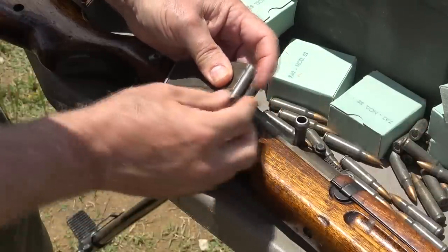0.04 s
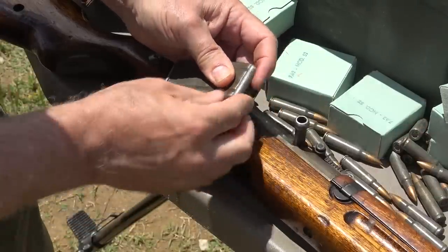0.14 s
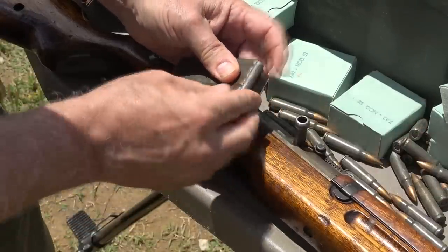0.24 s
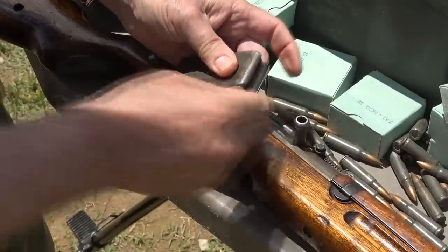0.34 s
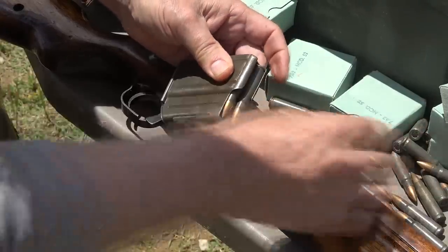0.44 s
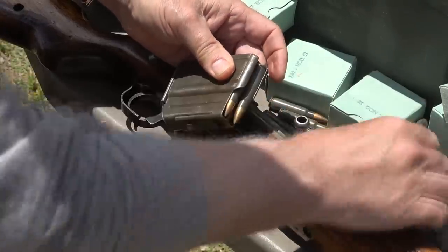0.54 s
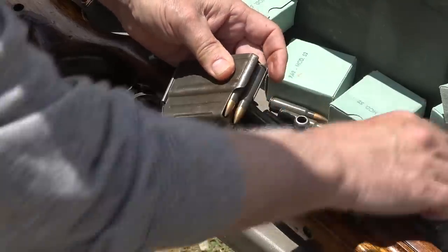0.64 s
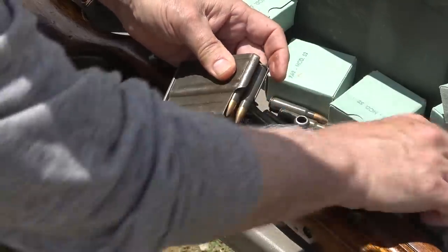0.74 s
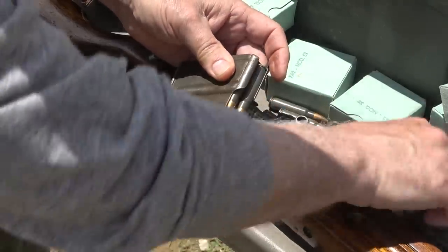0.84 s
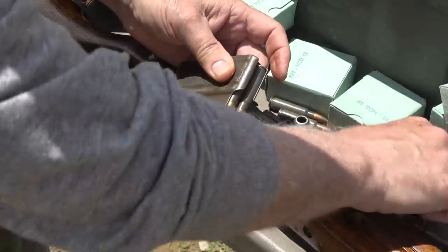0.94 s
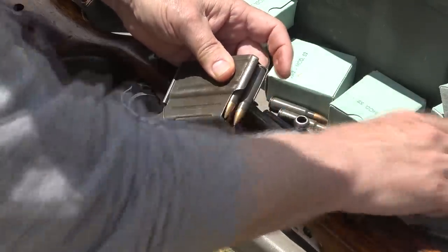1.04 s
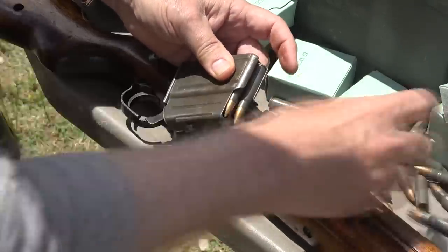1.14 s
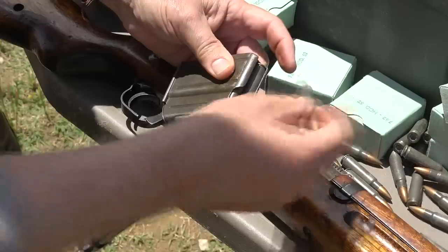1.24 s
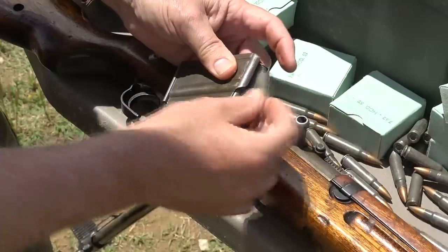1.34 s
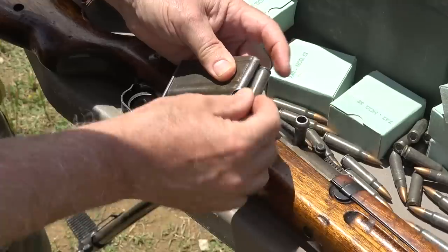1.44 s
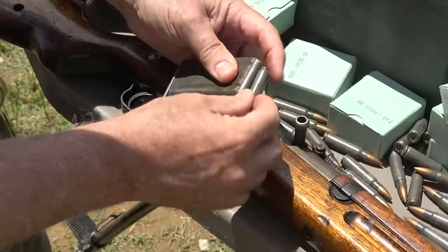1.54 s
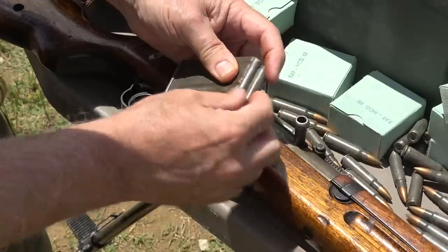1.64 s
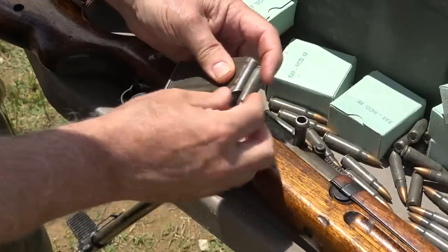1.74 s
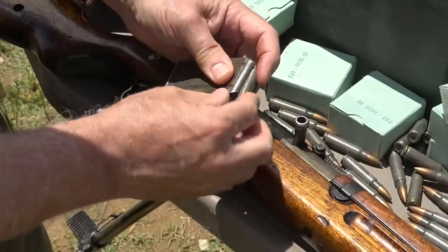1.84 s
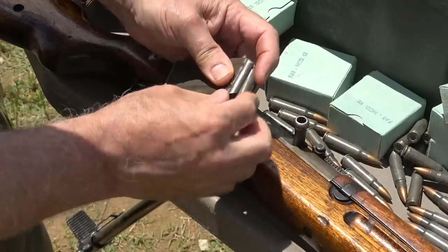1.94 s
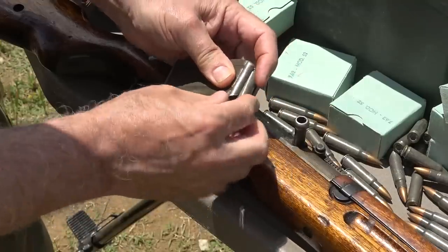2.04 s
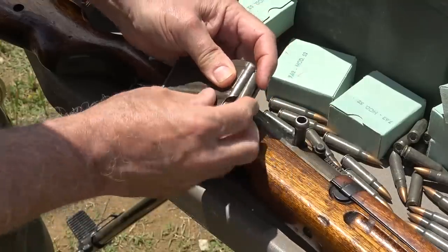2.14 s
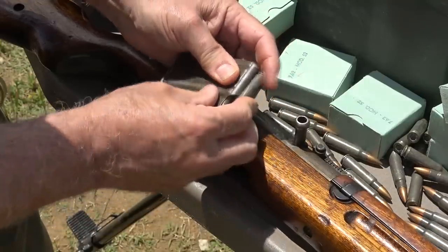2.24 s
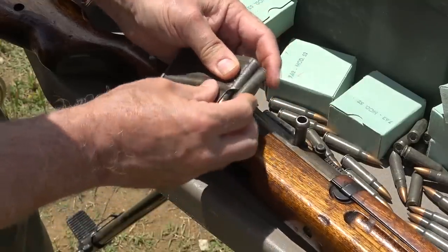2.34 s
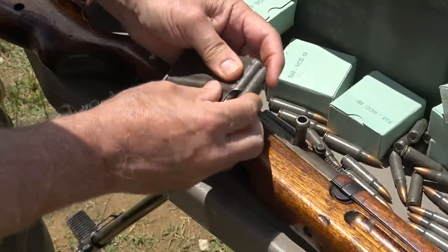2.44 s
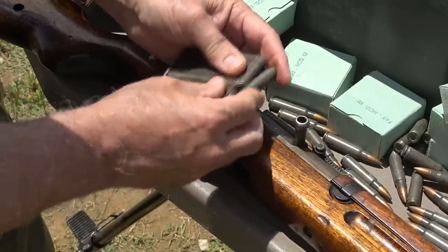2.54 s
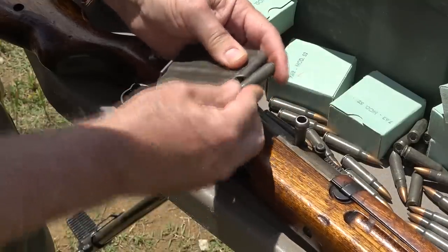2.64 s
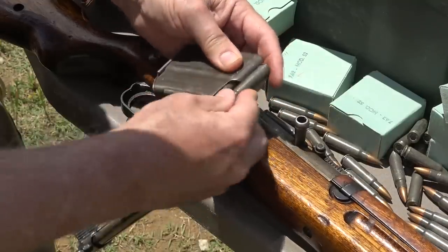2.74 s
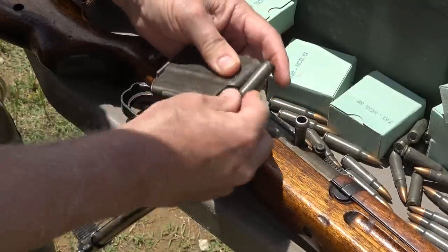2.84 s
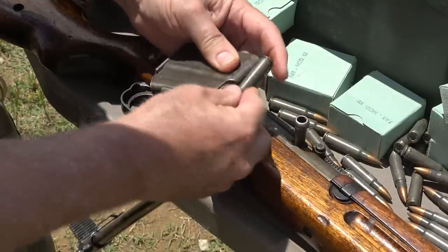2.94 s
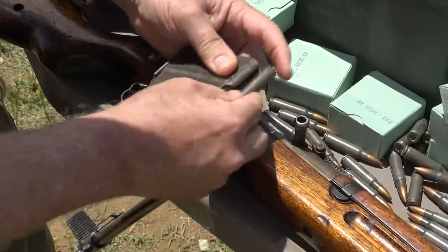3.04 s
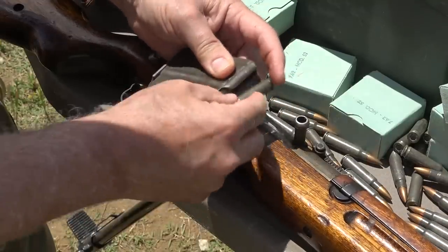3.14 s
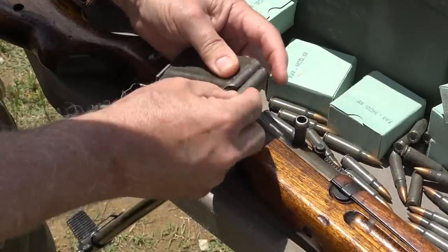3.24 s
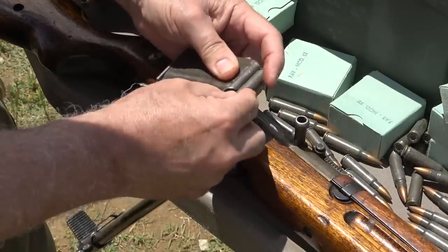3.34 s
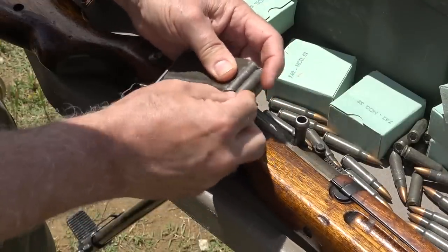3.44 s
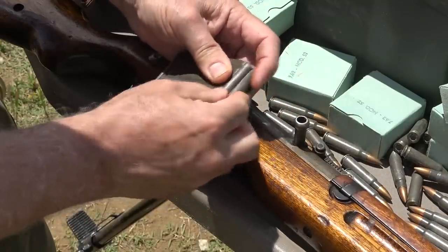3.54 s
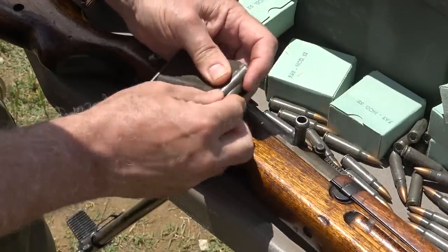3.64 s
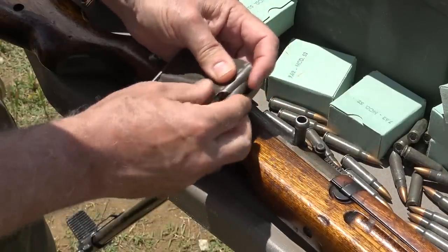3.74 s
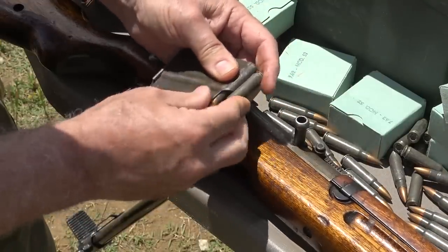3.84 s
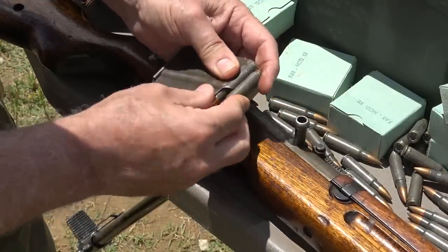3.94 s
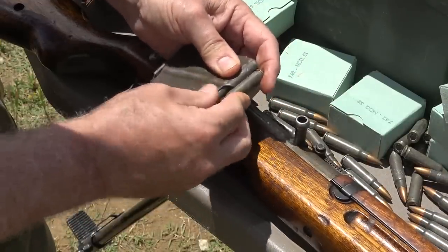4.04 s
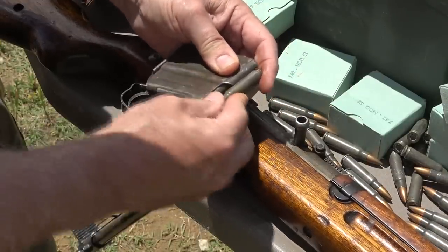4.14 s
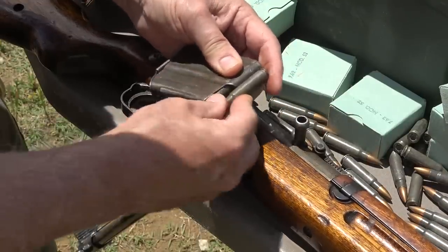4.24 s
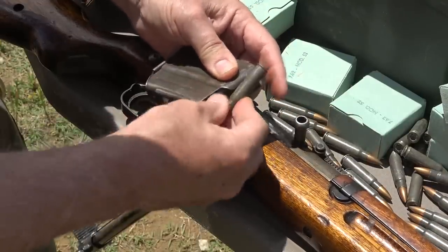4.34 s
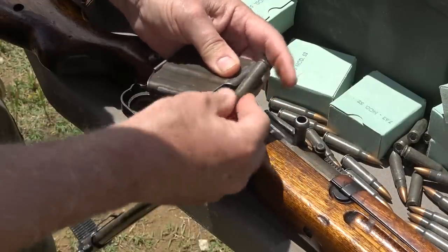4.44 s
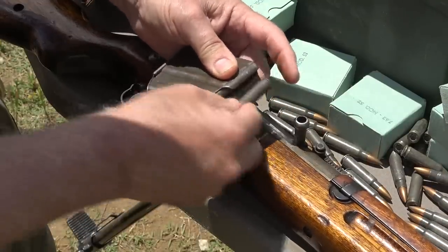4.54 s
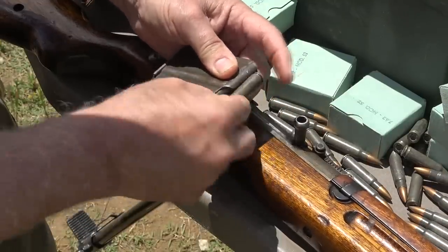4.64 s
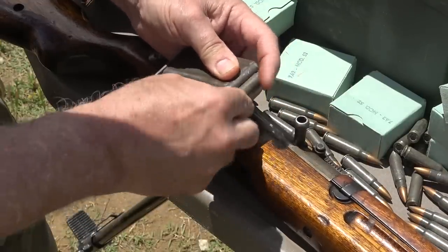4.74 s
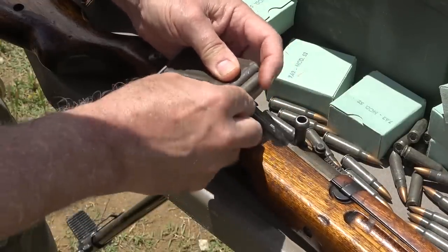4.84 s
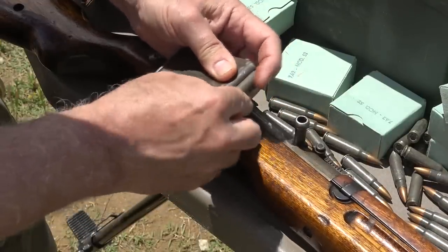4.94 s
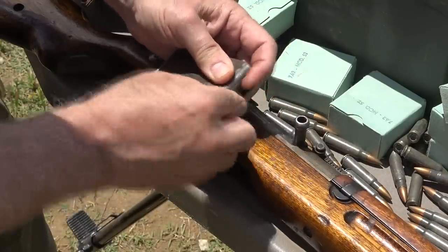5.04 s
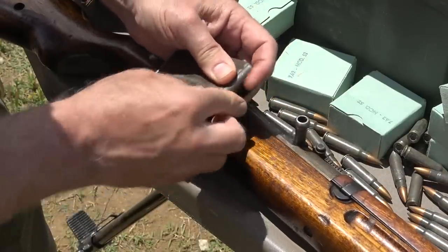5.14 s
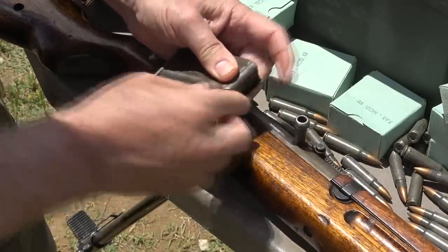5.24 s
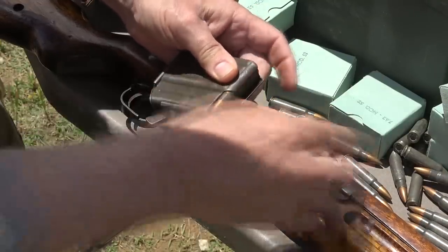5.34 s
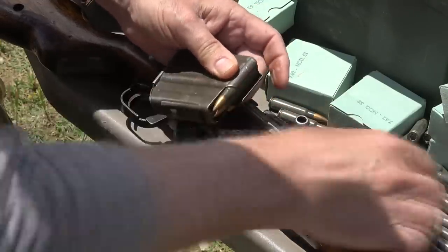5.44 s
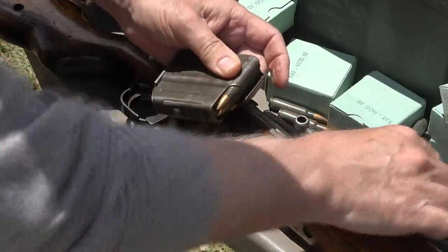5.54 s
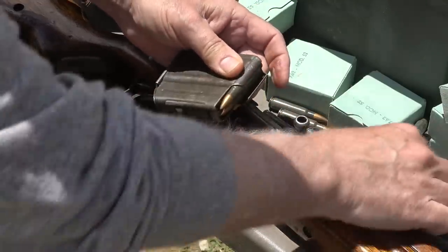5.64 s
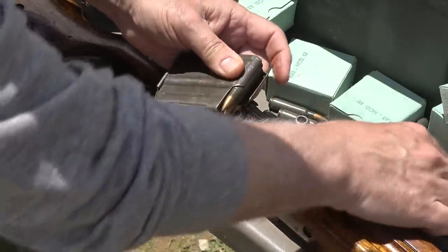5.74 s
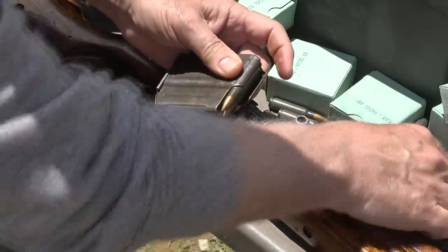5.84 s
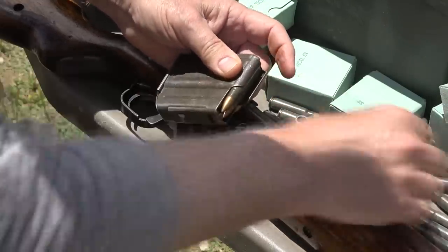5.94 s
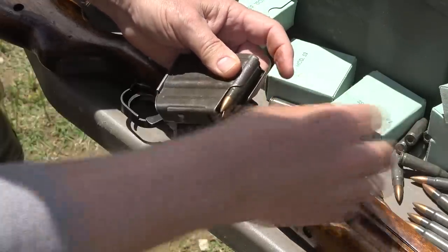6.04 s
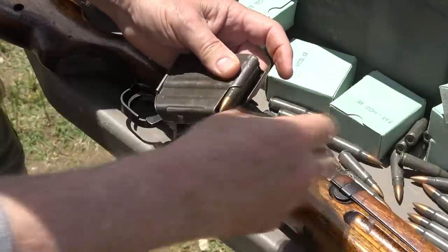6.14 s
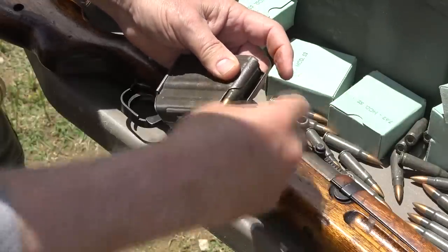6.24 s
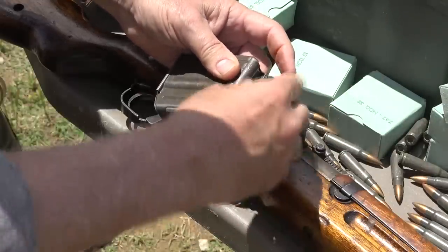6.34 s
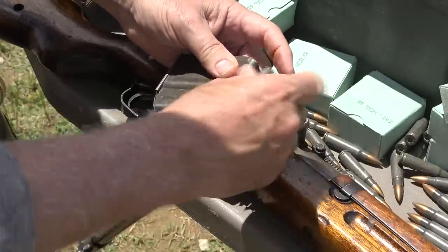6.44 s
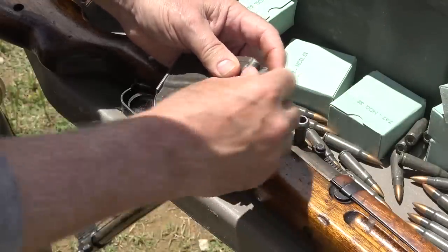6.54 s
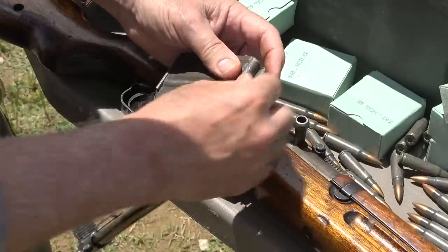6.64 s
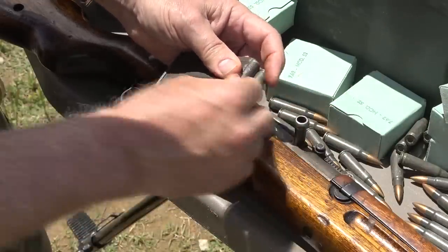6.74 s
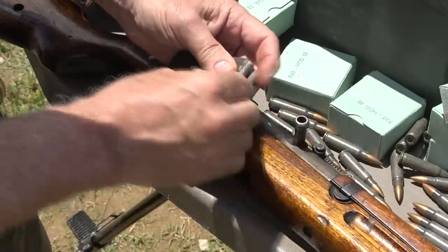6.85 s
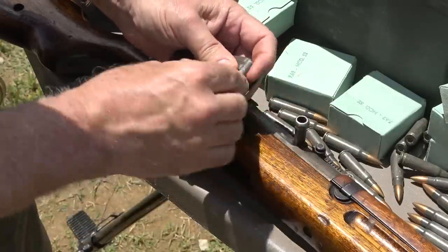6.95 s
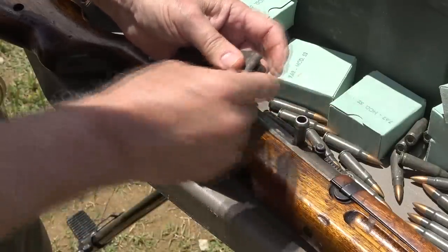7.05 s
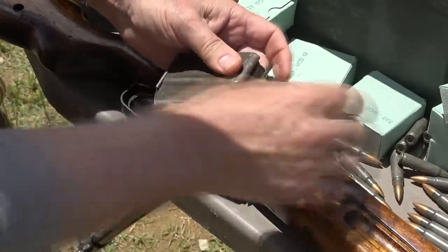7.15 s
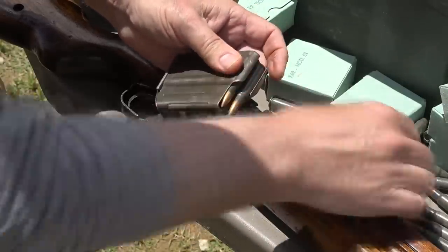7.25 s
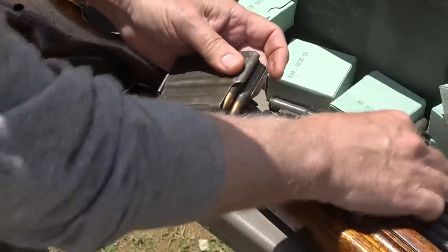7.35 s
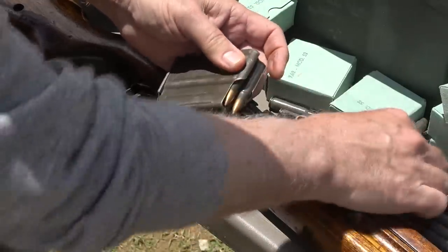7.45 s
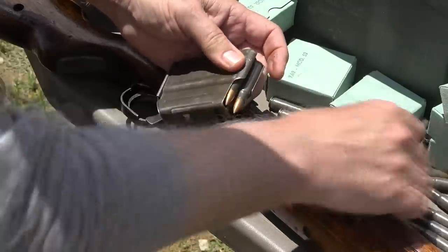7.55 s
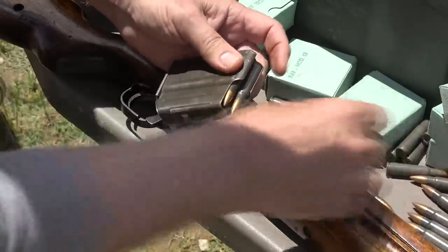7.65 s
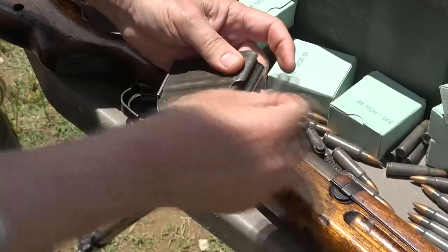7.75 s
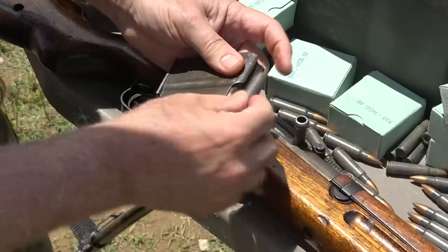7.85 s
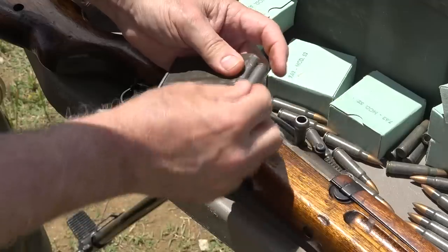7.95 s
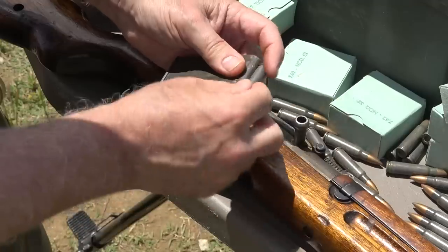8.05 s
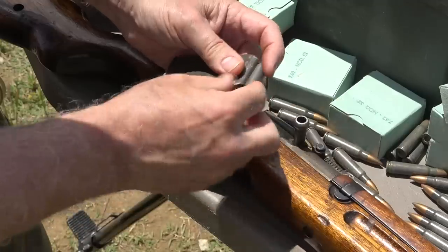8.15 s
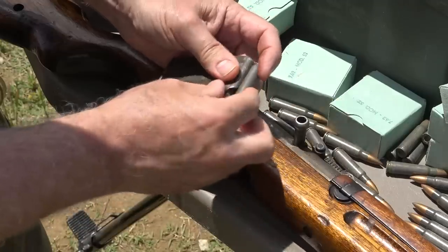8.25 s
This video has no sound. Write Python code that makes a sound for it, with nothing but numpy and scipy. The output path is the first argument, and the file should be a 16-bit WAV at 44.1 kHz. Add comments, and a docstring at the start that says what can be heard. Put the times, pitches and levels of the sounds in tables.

```python
"""Loading a rifle magazine outdoors

At a bench, cartridges are pressed into a hand-held steel box magazine: pitched cracks, choked steel rings and
stick-slip scrapes as each new round touches the lips, bounces, feels for its place and snaps home on the spring.
Three times the hand rummages: loose cartridges drum on the modes of a hollow plastic case and clink in beating notes.
Behind it: filtered-noise open air and wind puffs, gliding bird whistles and faint buzzy calls."""
import sys
import numpy as np
from scipy import signal
from scipy.fft import rfft, irfft, next_fast_len
from scipy.io import wavfile
from scipy.ndimage import uniform_filter1d, map_coordinates

SR = 44100
rng = np.random.default_rng(int(sys.argv[2]) if len(sys.argv) > 2 else 0)


def digitize_waveform(pressure):
    """Quantize a signal to 16-bit integers and store it at the path in sys.argv[1].

    Rows of a 2-D input are taken as channels; values are limited to [-1, 1].
    """
    field = np.atleast_2d(pressure).T
    bounded = np.clip(field, -1, 1)
    quanta = np.round(bounded * 32767).astype(np.int16)
    wavfile.write(sys.argv[1], SR, quanta)


N = 365148
CLOCK = np.arange(N) / SR  # seconds into the scene
AGE = np.arange(SR // 4) / SR  # seconds since a blow
TOP_HZ = 16200  # upper band limit of the whole sound


def amp(db):
    """Decibels to gain."""
    return 10 ** (np.asarray(db) / 20)


def unit(x):
    """Scale a sound to rms 1."""
    return x / np.sqrt(np.mean(x ** 2) + 1e-20)


def crest(x):
    """Scale a blow so that its loudest millisecond has the power of a full-scale sine."""
    loudest = uniform_filter1d(x ** 2, size=SR // 1000).max()
    return x / np.sqrt(2 * loudest + 1e-20)


def fade(t60):
    """Exponential decay after a blow, down 60 dB in t60 seconds."""
    return np.exp(-np.log(1000) * AGE / max(t60, 1e-4))


def add(track, s, sound):
    """Mix a sound into the track at s seconds."""
    part = track[max(round(s * SR), 0):][:len(sound)]
    part += sound[:len(part)]


def colour(x, points):
    """Minimum-phase filter through (Hz, dB) points, so that a blow keeps its sharp start."""
    n = x.shape[-1]
    m = 2 * next_fast_len(n // 2 + 1024)
    hz, db = np.transpose(points)
    bins = np.fft.rfftfreq(m, 1 / SR)
    curve_db = np.interp(np.log(bins + 1), np.log(hz), db)
    # folding the cepstrum onto positive time makes the filter causal
    cepstrum = irfft(np.log(amp(curve_db)))
    cepstrum[1:m // 2] *= 2
    cepstrum[m // 2 + 1:] = 0
    response = np.exp(rfft(cepstrum))
    return irfft(rfft(x, m) * response, m)[..., :n]


def resonate(x, hz, q):
    """Pass a sound through one resonance."""
    b, a = signal.iirpeak(min(hz, TOP_HZ), max(q, 1), SR)
    return signal.lfilter(b, a, x)


def wobble(rate):
    """A smooth random curve with rate knots a second."""
    knots = rng.standard_normal(int(N * rate / SR) + 4)
    return map_coordinates(knots, [CLOCK * rate])


def burst(t60):
    """The dying noise chatter of one contact."""
    return rng.standard_normal(len(AGE)) * fade(t60)


def ring(modes, cycles, scatter_db, detune):
    """Modes of a struck body: each blow draws new strengths and signs; each mode falls 60 dB in so many cycles."""
    total = np.zeros(len(AGE))
    for hz, db in modes:
        strength, shift, sign = rng.standard_normal(3)
        tone = np.sin(2 * np.pi * hz * (1 + detune * shift) * AGE)
        total += np.sign(sign) * amp(db + scatter_db * strength) * fade(cycles / hz) * tone
    return crest(total)


def swells(rows):
    """Gain of hand strokes or puffs that each rise to a peak and fall away."""
    gain = np.zeros(N)
    for s, swell, db in rows:
        distance = np.minimum(np.abs((CLOCK - s) / swell), 10)
        gain += amp(db) * np.exp(-distance ** 1.35)
    return gain


def place(x, left_db):
    """Pan a mono source so that the left is left_db above the right."""
    return x * amp([[left_db / 2], [-left_db / 2]])


# Spectrum of the distant hush. Each row: frequency in Hz, relative density in dB.
AIR_SPECTRUM = [(25, -12), (75, 0), (170, -1.5), (250, -9), (400, -8), (680, -4), (1100, -10.5),
                (1800, -26), (3500, -25.5), (7700, -31), (16000, -40)]
# Puffs of wind on the microphone. Each row: peak time in seconds, swell to 1/e in seconds, relative level in dB.
WIND_PUFFS = [(.21, 0.051, -40.5), (.81, 0.056, -29), (1.26, 0.037, -31.5), (2.385, 0.014, -37),
              (2.82, 0.025, -39), (2.9, 0.95, -53.5)]


def open_air(air_db=-50, side_db=-14, wind_db=-1, breeze_db=-66):
    """Outdoor hush as nearly mono noise, with soft low puffs of wind over a constant slight breeze."""
    mid, side = unit(colour(rng.standard_normal((2, N)), AIR_SPECTRUM)) * amp(air_db)
    wind = unit(colour(rng.standard_normal(N), [(35, -2.5), (160, -11.0), (2000, -91.0)]))
    wind_gain = amp(wind_db) * swells(WIND_PUFFS) + amp(breeze_db)
    return mid + amp(side_db) * np.array([side, -side]) + wind * wind_gain


# Buzzy calls of birds further off. Each row: middle in seconds, first pitch in Hz, last pitch in Hz.
FAR_BIRD_CALLS = [(2.02, 7700, 7630), (4.84, 3400, 4840), (5.552, 7370, 7320), (7.16, 7440, 7600),
                  (7.279, 4600, 3870), (7.82, 7650, 7400)]


def far_birds(length_s=0.19, level_db=-62, buzz_hz=190):
    """Faint calls that swell and glide between two pitches, with fast random pitch flutter for the buzz."""
    out = np.zeros(N)
    flutter = wobble(900)
    for s, first_hz, last_hz in FAR_BIRD_CALLS:
        progress = np.clip((CLOCK - s) / length_s + .5, 0, 1)
        pitch = first_hz + (last_hz - first_hz) * progress + buzz_hz * flutter
        out += np.sin(np.pi * progress) * np.sin(2 * np.pi * np.cumsum(pitch) / SR)
    return amp(level_db) * out


# Whistled bird notes. Each row: middle in seconds, length in seconds, first pitch in Hz,
# pitch it settles towards in Hz before any lift, level in dB before the flicker.
BIRD_NOTES = [(2.919, 0.066, 6050, 5560, -44.5), (2.981, 0.045, 5500, 8730, -42.5),
              (3.072, .15, 6700, 5820, -48.5), (7.785, 0.21, 5350, 5160, -62),
              (8.132, 0.036, 8000, 5700, -55.5)]


def bird(glide_rate=9.7, lift_hz=250, flicker_db=1.2):
    """Thin sine whistles that swell, settle on a pitch and fade with a flickering level; falling notes lift again."""
    out = np.zeros(N)
    for s, length, first_hz, held_hz, db in BIRD_NOTES:
        progress = np.clip((CLOCK - s) / length + .5, 0, 1)
        glide = (first_hz - held_hz) * np.exp(-glide_rate * progress)
        lift = lift_hz * (first_hz > held_hz) * progress ** 2
        phase = 2 * np.pi * np.cumsum(held_hz + glide + lift) / SR
        out += amp(db) * np.sin(np.pi * progress) * np.sin(phase)
    return out * amp(flicker_db * wobble(120))


def surroundings(x, t60=0.12, wet_db=-22):
    """Weak scatter from the bench, the boxes and the ground: a short, soft-starting noise tail for each ear."""
    onset = 1 - np.exp(-AGE / 0.014)
    tails = np.array([colour(burst(t60) * onset, [(2000, 8.6), (7000, 1.2)]) for _ in range(2)])
    tails = tails + tails.mean(axis=0)  # a shared part narrows the stereo image
    tails = tails / np.linalg.norm(tails[0])
    return amp(wet_db) * signal.fftconvolve(x[None], tails, axes=1)[:, :N]


def near_scatter(x, t60=0.0087, side_db=-20.5):
    """A very short, faint echo with opposite sign to left and right gives nearby sounds a slight width."""
    echo = colour(burst(t60), [(1500, 2), (8000, 6.0)])
    side = amp(side_db) * signal.fftconvolve(x, echo / np.linalg.norm(echo))[:N]
    return np.array([side, -side])


def bumps(rate=170):
    """Impulses at random moments, rate a second on average, of uneven strength and sign."""
    return (rng.random(N) < rate / SR) * rng.uniform(-1.1, 1, N)


def rolling_chatter():
    """Noise that flares and dies with every small bump."""
    return signal.fftconvolve(bumps(), fade(0.0087))[:N] * rng.standard_normal(N)


# Cartridges rolling on the case. Each row: peak time in seconds, swell to 1/e in seconds, relative level in dB.
ROLLING_STROKES = [(.745, 0.027, -26.5), (.91, 0.09, -27), (1.07, 0.14, -31), (5.78, 0.068, -31),
                   (7.565, 0.089, -30)]
# Modes of the plastic case. Each row: frequency in Hz, relative strength in dB.
CASE_MODES = [(320, -12.5), (390, -10.5), (510, -8.5), (590, -3.5), (715, 0), (850, -2.5), (980, 1.5),
              (1130, -1), (1260, -1.5), (1730, -1), (3250, -2.5)]
# Dull thud of the case. Each row: frequency in Hz, relative gain in dB.
THUD_SPECTRUM = [(100, -45), (250, -29.5), (400, -1.5), (1300, 4.5), (2300, -8), (3400, -13), (9500, -32.5),
                 (13000, -66)]
# Hard tick of a cartridge. Each row: frequency in Hz, relative gain in dB.
TICK_SPECTRUM = [(500, -0.5), (2500, -13.5), (6500, 5.5), (10200, -2), (16000, -64)]
SHELL_HZ = 9264  # the note of a cartridge's shell


def case_rolling(level_db=-2, thud_db=-2, clatter_db=-5, jingle_db=-23, shell_db=-24):
    """The pile shifts in many small bumps that drum on the case modes, clatter together and tick the shells."""
    panel = ring(CASE_MODES, cycles=30, scatter_db=0, detune=0)
    thud = crest(colour(burst(0.025), THUD_SPECTRUM))
    drumming = unit(signal.fftconvolve(bumps(), panel + amp(thud_db) * thud)[:N])
    clatter = unit(resonate(rolling_chatter(), 1300, q=1.4) + resonate(rolling_chatter(), 2200, q=5.5))
    jingle = unit(colour(rolling_chatter(), TICK_SPECTRUM))
    shells = unit(resonate(jingle, SHELL_HZ, q=49))
    pile = drumming + amp(clatter_db) * clatter + amp(jingle_db) * jingle + amp(shell_db) * shells
    return amp(level_db) * swells(ROLLING_STROKES) * pile


# Cartridges bumping the case. Each row: start in seconds, relative level in dB, relative depth of tone in dB.
CASE_BUMPS = [(0.6478, -2.5, -4), (.667, -9, -14.5), (0.707, -15, -24.5), (0.848, -14, -9.5),
              (0.8606, -11.5, -8), (.8912, -4.5, -6), (0.8975, -4, -5), (0.9222, -10, -16),
              (0.9631, -5, -2), (0.9937, -8.5, -2), (1.044, -7, -9), (1.0707, -7.5, 3), (1.0838, -6, -6),
              (1.1131, -3, -2.5), (1.1448, -10.5, -10), (1.1703, -12.5, 1.5), (5.659, -19.5, -15),
              (5.6704, -10, -11), (5.724, -4.5, -8.5), (5.738, -14, -10), (5.785, -14, -5),
              (5.805, -10.5, -4), (5.8224, -4, -8), (5.9004, -9, -9.5), (5.9579, -5.5, -10),
              (5.9941, -3.5, 0.5), (6.0245, -4.5, -1.5), (6.039, -10.5, -3.5), (6.052, -4, -5),
              (7.389, -7, -9), (7.452, -6.5, -6.5), (7.46, -2.5, -5.5), (7.486, -12, -12),
              (7.5462, -6, -28), (7.5727, -8.5, -7), (7.5812, -6.5, -5.5), (7.6006, -8.5, -6),
              (7.6179, -5, -4), (7.626, -5.5, -18), (7.638, -8.5, -18), (7.65, -13, -8),
              (7.6849, -14.5, -22), (7.7225, -19, -26)]
REBOUND_S, REBOUND_SPREAD, REBOUND_DB = .007, 0.43, -9.5  # usual delay, its log spread, level against the knock
THRUST_HZ, THRUST_T60_S = 1239, 0.018  # first hollow swing of the panel: centre pitch, decay
CLACK_HZ, CLACK_SPREAD, CLACK_DB = 2140, 0.28, -9  # woody pitch: centre, log spread, level against the panel
HARD_DB, HARD_PER_DB = 6, 1.44  # treble of a knock at table level 0; gentler ones are duller


def case_knocks(tick_db=-16, level_db=-3.5):
    """A cartridge bumps the hollow case and rebounds: a thrust, panel modes, a thud, a woody clack and a small tick."""
    out = np.zeros(N)
    flights = REBOUND_S * np.exp(REBOUND_SPREAD * rng.standard_normal(len(CASE_BUMPS)))
    rebounds = [(s + flight, db + REBOUND_DB, depth_db) for (s, db, depth_db), flight in zip(CASE_BUMPS, flights)]
    for s, db, depth_db in [*CASE_BUMPS, *rebounds]:
        thrust_hz = THRUST_HZ * np.exp(0.13 * rng.standard_normal())
        thrust = crest(fade(THRUST_T60_S) * np.sin(2 * np.pi * thrust_hz * AGE))
        modes = ring(CASE_MODES, cycles=44.0, scatter_db=2.5, detune=0.0077)
        thud = crest(colour(burst(0.034), THUD_SPECTRUM))
        clack_hz = CLACK_HZ * np.exp(CLACK_SPREAD * rng.standard_normal())
        clack = crest(resonate(burst(0.0091), clack_hz, q=9.8))
        tick = crest(colour(burst(0.00098), TICK_SPECTRUM))
        knock = crest(thrust + modes + thud) + amp(CLACK_DB) * clack + amp(tick_db) * tick
        # blows near the middle of a panel are deeper
        tone = [(600, depth_db + 5.5), (1200, 0), (3500, HARD_DB + HARD_PER_DB * db)]
        add(out, s, amp(db + level_db) * crest(colour(knock, tone)))
    return out


# Cartridge on cartridge. Each row: start in seconds, relative ring level in dB, 60 dB decay in seconds if unchoked.
CARTRIDGE_CLINKS = [(.651, -24, 0.024), (.718, -20, 0.058), (.732, -21.5, 0.11), (.743, -25, 0.061),
                    (.831, -29.5, .05), (.862, -19, 0.042), (.925, -12.5, 0.036), (.962, -12.5, 0.076),
                    (.991, -17.5, 0.055), (1.044, -21, 0.064), (1.197, -19.5, 0.16), (1.2105, -27, 0.1),
                    (1.232, -19.5, 0.25), (1.271, -17, 0.051), (1.3045, -29, 0.074), (5.731, -26.5, 0.056),
                    (5.755, -23, 0.04), (5.803, -23.5, 0.049), (5.855, -22, 0.046), (5.959, -30, .08),
                    (7.453, -23.5, 0.13), (7.478, -22.5, 0.065), (7.511, -25.5, 0.092),
                    (7.549, -21.5, 0.11), (7.584, -19, 0.15)]
# A fresh round meets the magazine and bounces once. Each row: start in seconds, relative level in dB,
# relative treble edge in dB, pitch of the first contact in Hz.
ROUND_TOUCHES = [(1.4049, -13.5, 0.5, 4070), (6.3659, -22, 2.5, 11050), (7.8718, -12.5, -10, 6660)]
TOUCH_RING_DB, TOUCH_T60_S = -5, 0.055  # a round pinched in the fingers: ring against its touch, decay


def clinks(spread_hz=45, twin_db=-7, tick_s=0.017, level_db=-2):
    """Touching shells ring at nearly the same high note and beat, until the next touch chokes them."""
    out = np.zeros(N)
    pinched = [(s, db + TOUCH_RING_DB, TOUCH_T60_S) for s, db, edge_db, hz in ROUND_TOUCHES]
    rows = sorted([*CARTRIDGE_CLINKS, *pinched], key=lambda row: row[0])
    next_touch = [s for s, db, t60 in rows[1:]] + [N / SR]
    for (s, db, t60), stop in zip(rows, next_touch):
        detune = spread_hz * rng.standard_normal(2)
        first = np.sin(2 * np.pi * (SHELL_HZ + detune[0]) * AGE)
        second = np.sin(2 * np.pi * (SHELL_HZ + 2 * detune[1]) * AGE)
        shells = first * fade(t60) + amp(twin_db) * second * fade(t60 / 2)
        choke = np.interp(s + AGE - stop, AGE, fade(tick_s))  # 1 until the next touch
        tick = crest(colour(burst(tick_s), TICK_SPECTRUM))
        add(out, s, amp(db + level_db) * (shells * choke + tick))
    return out


def soft_bump(s=5.204, db=-25, hz=370):
    """A dull bump as the hand leaves the magazine: noise through two equal broad resonances."""
    out = np.zeros(N)
    dull = resonate(resonate(burst(0.1), hz, q=0.97), hz, q=0.97)
    add(out, s, amp(db) * crest(dull))
    return out


# Blows that set the spring ringing. Each row: start in seconds, pitch in Hz, level in dB.
SPRING_RINGS = [(5.11, 3000, -32), (6.6945, 3580, -35)]


def spring(t60=0.11):
    """The magazine spring sings on briefly after some blows, as a decaying sine."""
    out = np.zeros(N)
    for s, hz, db in SPRING_RINGS:
        add(out, s, amp(db) * fade(t60) * np.sin(2 * np.pi * hz * AGE))
    return out


# The nose of a round catches lightly on the lips. Each row: start in seconds, level of the pitched tick in dB,
# pitch in Hz.
LIP_TAPS = [(1.638, -37, 2700), (1.711, -41, 3900), (2.515, -47, 2880), (3.219, -43, 2070),
            (3.553, -36, 2270), (3.635, -36.5, 2180), (4.595, -33.5, 3120), (5.083, -35, 2980),
            (5.136, -30, 1900), (5.223, -30, 3000), (6.487, -25.5, 2070), (6.54, -32, 2040),
            (6.579, -33, 2130), (6.921, -15.5, 2540), (7.911, -31, 2350)]
# Hard crack of metal on metal. Each row: frequency in Hz, relative gain in dB.
SNAP_SPECTRUM = [(150, -70), (600, 0.5), (1400, -1), (2100, 6.5), (5000, 7), (7500, -1), (10000, -11),
                 (13000, -22.5), (16000, -40)]


def nose_taps(t60=0.036, q=4.9, edge_db=-13):
    """The tip of a round catches on the lips: a small resonant tick with a little broad crack."""
    out = np.zeros(N)
    for s, db, hz in LIP_TAPS:
        contact = burst(t60)
        pitched = crest(resonate(resonate(contact, hz, q=q), hz, q=1))
        crack = crest(colour(contact, SNAP_SPECTRUM))
        add(out, s, amp(db) * (pitched + amp(edge_db) * crack))
    return out


# A cartridge sliding under the feed lips. Each row: peak time in seconds, swell to 1/e in seconds,
# relative level in dB.
LIP_SLIDES = [(.263, 0.012, -32), (.381, 0.0073, -36), (1.797, 0.0038, -35), (1.835, 0.032, -46),
              (2.331, 0.011, -39.5), (2.875, 0.018, -38), (3.895, 0.012, -27), (4.344, 0.041, -43),
              (5.03, 0.041, -52.5), (5.291, 0.014, -37.5), (6.897, 0.005, -25)]
# Resonances that a slipping round excites. Each entry: frequency in Hz.
SLIP_RESONANCES = [2140, 3200, 4640, 5860, 9300]
# The round snaps home, first past the lip, then against the box. Each row: start in seconds, relative level in dB,
# relative treble edge in dB, pitch of the second blow in Hz, gap between the blows in seconds.
ROUND_SEATS = [(0.1101, -10.5, 5.5, 4770, 0.0019), (5.1061, -7.5, 7, 2790, 0.0037),
               (6.93, -7.5, 6, 2340, .004)]
# after a snap the round slides back on the spring: delay, swell, level against the snap
SETTLE_S, SETTLE_SWELL_S, SETTLE_DB = 0.018, 0.044, -29.5


def magazine_slides(grain_db=6, level_db=-1, handling_db=-67):
    """Metal sticks and slips through several resonances as a round slides; the fingers never rest entirely."""
    settling = [(s + SETTLE_S, SETTLE_SWELL_S, db + SETTLE_DB) for s, db, edge_db, hz, gap in ROUND_SEATS]
    handling = amp(handling_db + 5.9 * wobble(7.7))
    pressure = amp(level_db) * swells([*LIP_SLIDES, *settling]) + handling
    slips = np.zeros(N)
    for hz in SLIP_RESONANCES:
        grain = amp(grain_db * np.minimum(wobble(220), 2))  # each resonance has its own stick-slip
        slips += unit(resonate(rng.standard_normal(N) * grain, hz, q=3.9))
    scrape = colour(slips * amp(2.5 * wobble(500)), [(3000, 2.0), (10000, -6.5), (14000, -8)])
    return pressure * unit(scrape)


# The round is worked against the feed lips. Each row: start in seconds, relative level in dB,
# relative treble edge in dB, pitch of the contact in Hz.
LIP_CLICKS = [(0.0603, -26.5, -6, 5200), (0.0766, -11.5, -27, 5100), (0.085, -20, -1, 2125),
              (0.146, -24, -24, 1830), (1.5787, -27.5, -27, 4130), (1.8503, -24, 5.5, 2200),
              (2.296, -29, 4, 3180), (2.656, -11, -7, 7450), (2.996, -20.5, -8, 5660),
              (3.2603, -9.5, -9, 4800), (3.2888, -10, 12, 4730), (3.5027, -26, -2.5, 2600),
              (3.6925, -17.5, -12.5, 3250), (4.1787, -26.5, -8, 3200), (4.3472, -19, -28, 2530),
              (4.5302, -18, -2.5, 1990), (4.6178, -23.5, 1, 4460), (4.6362, -29, 12, 2100),
              (4.6829, -12, -0.5, 5450), (5.2316, -25.5, -2, 2940), (6.417, -24.5, 2, 3680),
              (6.632, -19.5, -2, 5500), (6.6945, -13, -3.5, 2800), (6.7959, -16.5, -11, 6500),
              (7.0495, -25, -12, 1890), (7.0998, -24, -13, 2240), (7.9735, -16.5, 1, 4130)]
# Modes of the steel magazine, damped by the hand. Each row: frequency in Hz, relative strength in dB.
MAGAZINE_MODES = [(2050, 13.5), (2500, -11.5), (3050, -0.5), (4800, 2), (9400, -10)]
BOUNCE_S, BOUNCE_DB = .0105, -4  # delay after the touch, level against it
SLIP_HZ, SLAP_DB = 5320, -0.5  # pitch of a snap's first blow; level of the second against it
RATTLE_S, RATTLE_DB = .0055, -8.5  # delay after the second blow, level against the first


def contacts():
    """Every blow on the magazine: a touch bounces onto its shell, a snap is two quick blows and a rattle."""
    blows = [*ROUND_TOUCHES, *LIP_CLICKS]
    for s, db, edge_db, hz in ROUND_TOUCHES:
        blows.append((s + BOUNCE_S, db + BOUNCE_DB, edge_db, SHELL_HZ))
    for s, db, edge_db, hz, gap in ROUND_SEATS:
        blows.append((s, db, edge_db, SLIP_HZ))
        blows.append((s + gap, db + SLAP_DB, edge_db, hz))
        blows.append((s + gap + RATTLE_S, db + RATTLE_DB, edge_db, hz))
    return blows


def magazine_clicks(ring_db=-13, chatter_db=-11, pitch_db=-3, bite_s=0.00047, level_db=-1):
    """Each contact is a hard crack with its own pitch, a short chatter and the choked ring of the steel box."""
    out = np.zeros(N)
    bite = 1 - np.exp(-AGE / bite_s)
    for s, db, edge_db, hz in contacts():
        contact = (burst(0.0052) + amp(chatter_db) * burst(0.027)) * bite
        steel = ring(MAGAZINE_MODES, cycles=85, scatter_db=4, detune=.05)
        click = crest(colour(contact, SNAP_SPECTRUM)) + amp(ring_db) * steel
        # light and low-pitched contacts have more low body
        body_db = 0.5 - 0.2 * db - 6.5 * np.log2(hz / 3500)
        tone = [(1300, body_db), (2200, 0.25 * body_db - 3.375), (3200, 0), (6000, 0.0089), (10000, edge_db + 10.5)]
        click = crest(colour(click, tone))
        click += amp(pitch_db) * crest(resonate(contact, hz, q=8.6))
        add(out, s, amp(db + level_db) * crest(click))
    return out


def scene():
    """The magazine is straight ahead, the pile of cartridges to the right."""
    magazine = magazine_clicks() + magazine_slides() + nose_taps() + spring() + soft_bump()
    case = colour(case_knocks() + case_rolling(), [(60, -13.5), (300, 0.5)])  # a small case radiates little bass
    shells = clinks()
    # left, then right: the low notes of the pile lean furthest right
    pile = np.array([colour(case, [(600, side * 2.03), (1800, side * .6)]) for side in (-1, 1)])
    near = magazine + pile + place(shells, left_db=-2.5)
    scatter = near_scatter(magazine + case + shells) + surroundings(magazine + case)
    return near + scatter + bird() + far_birds() + open_air()


def record(dry):
    """Keep nothing above the band limit, with a steep cut in the spectrum."""
    m = next_fast_len(N + SR // 2)
    kept = np.fft.rfftfreq(m, 1 / SR) < TOP_HZ
    return irfft(rfft(dry, m) * kept, m)[:, :N]


dry = scene()
out = record(dry)
digitize_waveform(out)
```